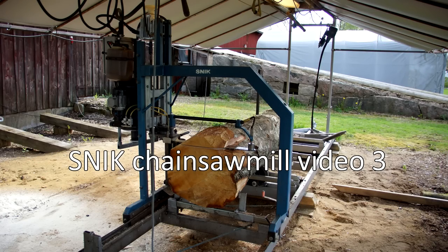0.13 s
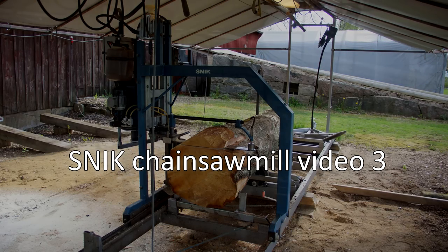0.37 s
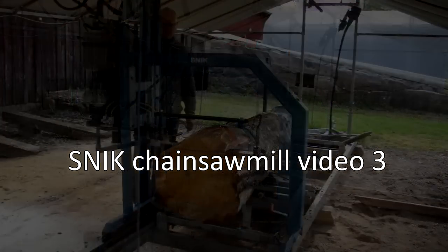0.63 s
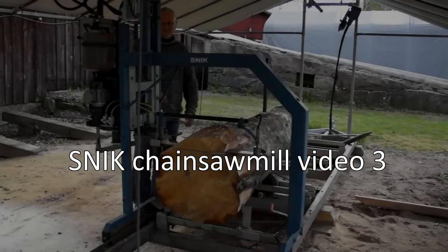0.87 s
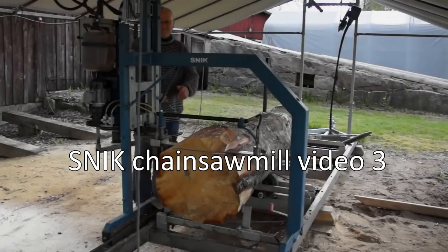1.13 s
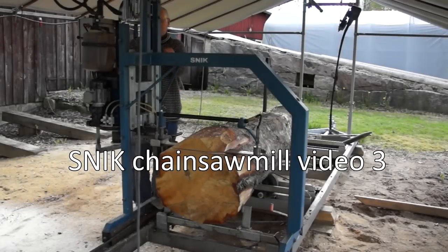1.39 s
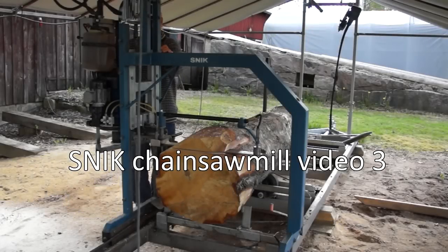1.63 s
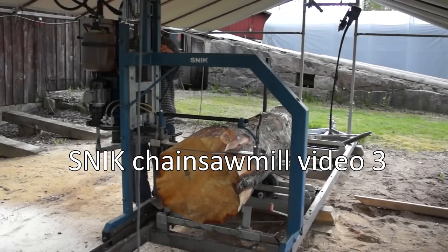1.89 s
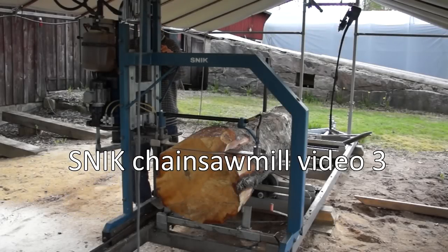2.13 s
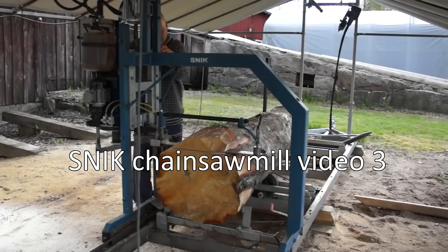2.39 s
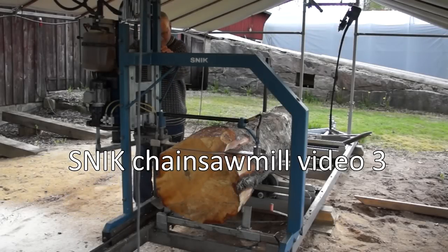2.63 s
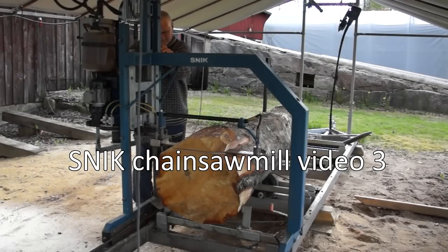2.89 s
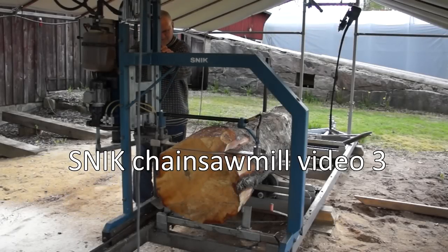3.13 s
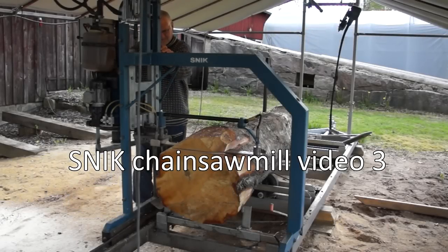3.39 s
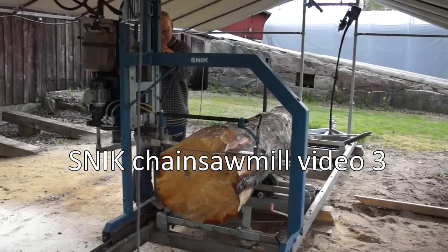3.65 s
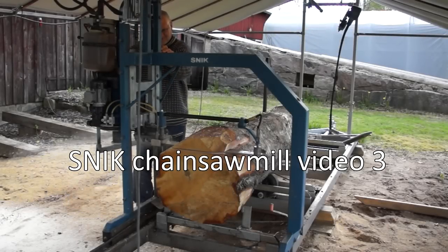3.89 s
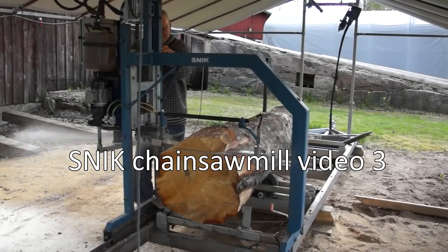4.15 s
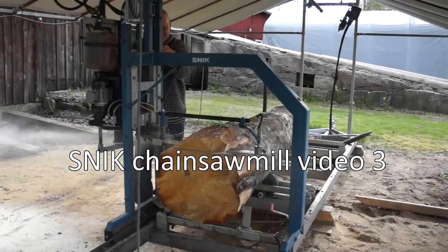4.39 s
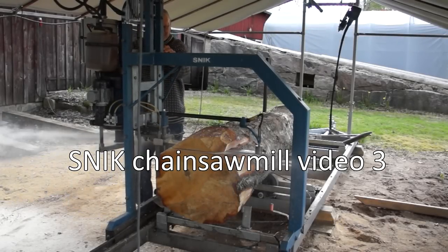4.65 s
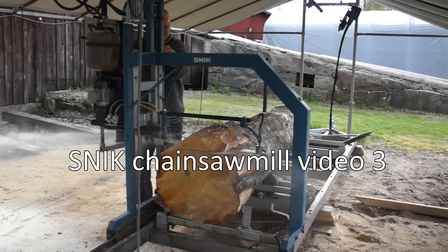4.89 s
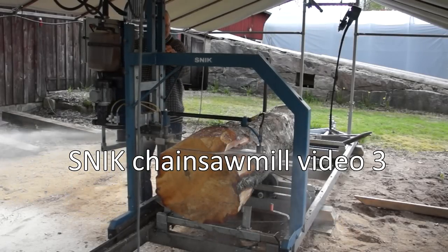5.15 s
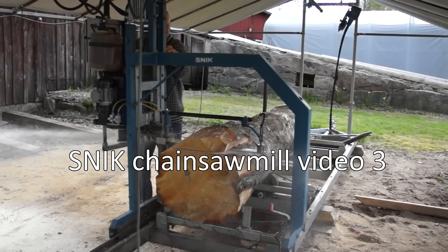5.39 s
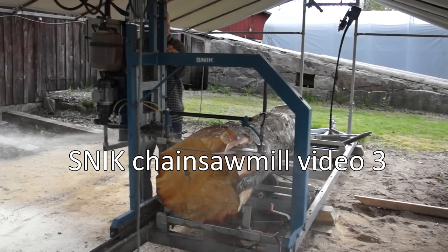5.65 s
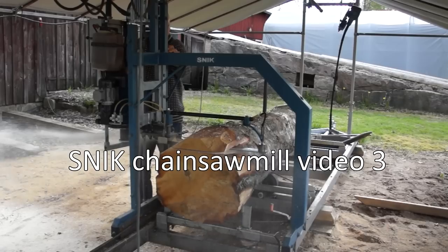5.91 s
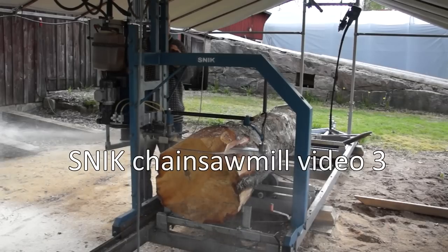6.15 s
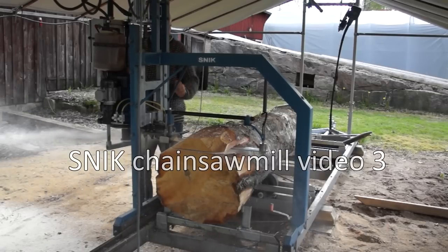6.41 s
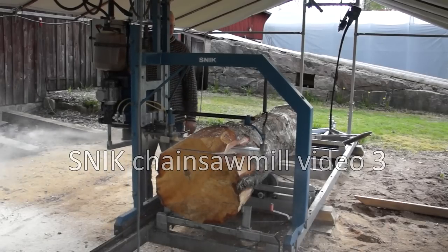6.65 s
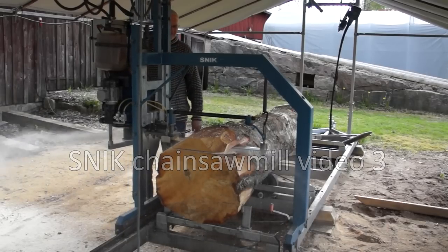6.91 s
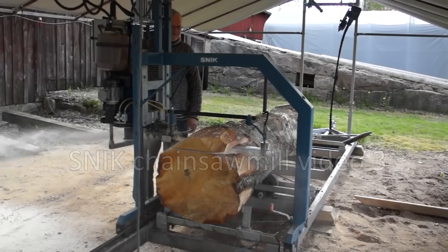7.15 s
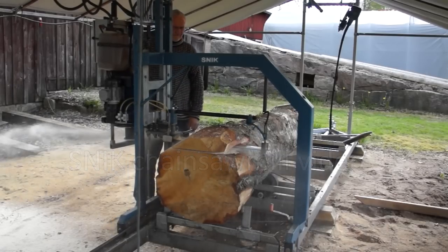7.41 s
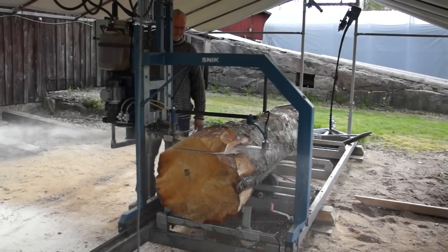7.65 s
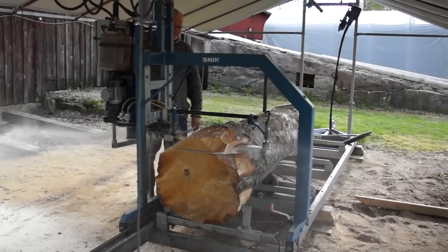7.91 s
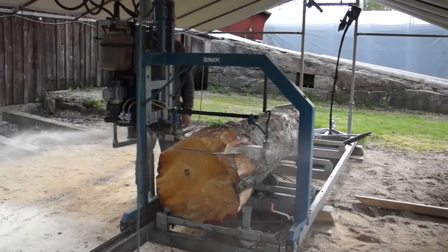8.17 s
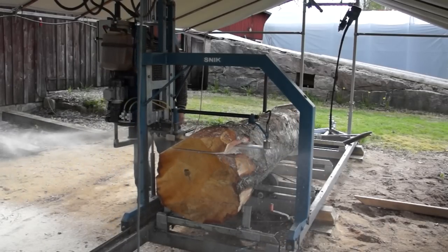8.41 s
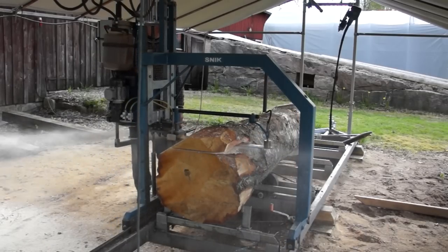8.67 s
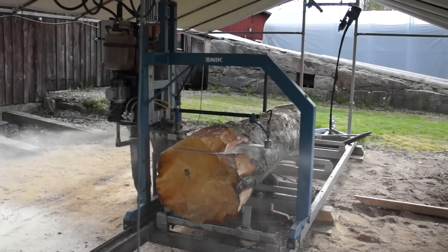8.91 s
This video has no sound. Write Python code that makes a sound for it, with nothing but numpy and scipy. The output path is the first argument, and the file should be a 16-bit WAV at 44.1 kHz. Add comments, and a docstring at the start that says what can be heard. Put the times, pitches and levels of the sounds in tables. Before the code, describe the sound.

Quiet yard air with three tiny ticks, then a chain sawmill fades in while rapidly spinning up to a high, steady belt whine with rushing chain hiss. After about three seconds of free running it bites into a log; pitch dips and wobbles, a coarse buzzing growl joins. Faint wooden knocks. Stereo microphones near the machine, open shed, little echo.

```python
"""A quiet yard with three small ticks, then a belt-driven chain sawmill under an open shed roof fades in.
It spins up, runs free and bites into a log, whose load drags the speed down.
Drive links striking an eight-tooth sprocket and a whining toothed belt are sums of shaft-locked partials;
rumble, chain roar, hiss, belt air and guard ringing are shaped noise; wooden knocks are decaying modes."""
import sys
import numpy as np
from scipy import signal
from scipy.fft import rfft, irfft
from scipy.io import wavfile
from scipy.ndimage import uniform_filter1d

SR = 44100
rng = np.random.default_rng(int(sys.argv[2]) if len(sys.argv) > 2 else 0)


def convert_level_to_amplitude(level_db):
    """Map a level in decibels to its linear amplitude factor."""
    exponent = np.asarray(level_db, float) / 20
    return 10 ** exponent


def store_wav(level_fs):
    """Save 16-bit WAV to argv[1]."""
    pcm = np.round(np.clip(np.atleast_2d(level_fs), -1, 1) * 32767)
    wavfile.write(sys.argv[1], SR, pcm.T.astype(np.int16))


N = 398663

T = np.arange(N) / SR
STEP = np.arange(1024) / 100  # control times, s
FRAME_T = np.arange(N // 256 + 5) * 256 / SR  # noise frame times, s
HZ = np.fft.rfftfreq(1024, 1 / SR)
FULL_S, CLIMB_END_S = .825, .8  # full speed reached; end of the spin-up emphasis of the noise
BELT_TEETH, LOOPS_PER_TURN = 171, .25259  # belt loops for each shaft turn
# cut depth, 0 free, 1 biting, 2 deep, 3 settled: (time [s], depth [stage])
DEPTH = [(0, 0), (3.62, 0), (3.72, 1), (4.9, 1), (5.7, 2), (7, 2), (7.6, 3), (9.1, 3)]
# belt whine: (time [s], relative level [dB], centre under load [lines from the tooth rate])
WHINE = [(.5, -55, 0), (.7, -37, -1), (.84, -29, -1.3), (1.7, -22, -1.5), (3.6, -21.5, -.7),
         (3.75, -24, -1.2), (4.2, -22, .1), (4.62, -26, .3), (4.92, -22.5, 1), (5.2, -27, 1.2),
         (5.58, -28, 1), (5.68, -34, 1.5), (5.92, -36, 0), (5.97, -24, -.8), (6.15, -27.5, -2),
         (6.5, -24, -.5), (6.62, -30, -1), (6.76, -30, -1.1), (6.85, -24, -1), (7.35, -22, -.7),
         (7.5, -21.5, .8), (7.7, -20, -.3), (8.25, -20, -.8), (8.4, -22, -.4), (8.55, -18.5, -.3),
         (8.75, -21, .1), (9.04, -20, -.2)]
# frame rumble, chain roar, hiss, relative levels:
# (free [dB], biting [dB], deep [dB], settled [dB], share of the fade-in [ratio])
LAYERS = [(-40.5, -38.5, -37, -36.5, 0.44), (-24, -22.5, -22, -24, 0.91), (-24.5, -25.5, -25, -27.5, 1.19)]


def curve(rows, t=T):
    """Piecewise-linear interpolation of every column against the first."""
    s, *columns = np.transpose(rows)
    return np.array([np.interp(t, s, c) for c in columns])


def read(points, hz):
    """Spectral envelope interpolated on a logarithmic frequency axis."""
    return curve([(np.log(p[0]), *p[1:]) for p in points], np.log(hz + 1))


def by_depth(values, t):
    """Load dependence: one value for each stage of the cut, interpolated between stages."""
    return np.interp(curve(DEPTH, t)[0], range(len(values)), values)


def loading(t):
    """Load of the wood on the drive, 0 running free to 1 cutting."""
    return np.minimum(curve(DEPTH, t)[0], 1)


def swell(t):
    """Exponential approach: the mill's fade-in, in dB."""
    from_s, rise_s = 0.24, 0.85
    return 20 * np.log10(1 - np.exp(-np.maximum(t - from_s, .004) / rise_s))


def speed(t):
    """Shaft speed over time, in turns per second: a ramp up, a steady run, then slower, unsteady turning."""
    start_s, start_speed, free_speed, bite_s = .27, 33, 137.49, 3.64
    # sprocket shaft dragged by the wood: (time [s], speed [turns/s])
    dragged = [(3.69, 134.6), (3.82, 136.3), (3.89, 135.4), (3.96, 136.1), (4.12, 133.4), (4.26, 130.7),
               (4.42, 131.8), (4.52, 130.3), (4.68, 129.4), (4.9, 131.3), (5.06, 129.2), (5.16, 129.1),
               (5.29, 124.5), (5.41, 125.8), (5.53, 123.8), (5.66, 129.8), (5.76, 130.4), (5.88, 128.8),
               (5.94, 129), (6.06, 126.85), (6.2, 128.6), (6.28, 127.9), (6.44, 129.9), (6.56, 129.25),
               (6.67, 130.5), (6.88, 130), (7, 127.8), (7.16, 129.3), (7.27, 129.1), (7.36, 130.1),
               (7.5, 126), (7.62, 128), (7.76, 127.7), (7.82, 128.9), (8.08, 129.7), (8.18, 128.6),
               (8.26, 129.35), (8.42, 128.95), (8.5, 129.75), (8.7, 127.75), (9.04, 128.15)]
    ramp = [(start_s, start_speed), (FULL_S, free_speed), (bite_s, free_speed)]
    return curve(ramp + dragged, t)[0]


def slow(rate, count):
    """Low-passed random drifts of rms 1, one row each, at 100 points a second; rate in Hz."""
    hz, z = np.fft.rfftfreq(1024, .01), rfft(rng.standard_normal((count, 1024)))
    drift = irfft(z / (1 + (hz / rate) ** 2))
    return drift / drift.std(1, keepdims=True)


def tone(turns, multiple, db, waver_db, rate, wander, start):
    """Order locking: one partial follows the shaft angle while its level and phase [rad] drift."""
    level_drift, phase_drift = slow(rate, count=2)
    phase = 2 * np.pi * multiple * turns + np.interp(T, STEP, start + wander * phase_drift)
    return np.interp(T, STEP, np.sqrt(2) * convert_level_to_amplitude(db + waver_db * level_drift)) * np.cos(phase)


def noise(shape_db, level_db, patchy_db, flicker_db):
    """Partly coherent noise: random short-time spectra for two microphones, level set frame by frame."""
    # shared part of the two microphones: (frequency [Hz], coherence [ratio])
    coherence = [(60, 0.093), (120, 0.51), (240, 0.79), (480, 0.14), (950, 0.62), (1900, 0.86),
                 (2600, 0.81), (3300, 0.66), (4000, 0.99), (5000, 0.79), (6000, 0.68), (7200, 1),
                 (9000, 0.74), (15000, 0.54)]
    # balance: (frequency [Hz], left minus right [dB])
    tilt = [(60, -2.5), (150, -2.5), (380, 0.5), (950, 1), (2380, 0.0), (5980, 0), (15000, 0.5)]
    frames = shape_db.shape[1]
    a, b, c, d, patches = rng.standard_normal((frames, 513, 5)).T
    patches = uniform_filter1d(uniform_filter1d(patches, size=10, axis=0), size=12, axis=1)
    flicker = uniform_filter1d(rng.standard_normal(frames), size=8)
    waver_db = patchy_db * patches / patches.std() + flicker_db * flicker / flicker.std()
    shape = convert_level_to_amplitude(shape_db)
    shape = shape / np.sqrt((shape ** 2).sum(0)) * convert_level_to_amplitude(level_db + waver_db)
    same = np.clip(read(coherence, HZ)[0], -1, 1)[:, None]
    left = a + 1j * b
    right = same * left + np.sqrt(1 - same ** 2) * (c + 1j * d)
    lean = read(tilt, HZ)[0][:, None] / 2
    z = np.array([left, right]) * shape * convert_level_to_amplitude(np.array([lean, -lean]))
    return signal.istft(z, nperseg=1024, noverlap=768)[1][:, :N]


def hump(x, width):
    """Resonance-like band, in dB: flat near zero, falling steeply beyond the width."""
    return -10 * np.log10(1 + (x / width) ** 4)


def layer_db(row):
    """Level of one noise layer: load dependence, fade-in and a steep rise at the very start."""
    *db, share = row
    return by_depth(db, FRAME_T) + share * swell(FRAME_T) - 220 * np.maximum(.27 - FRAME_T, 0)


def blend(points):
    """Spectral envelope crossing from free running to cutting as the load grows."""
    free_db, cut_db = read(points, HZ)
    load = loading(FRAME_T)
    return np.outer(free_db, 1 - load) + np.outer(cut_db, load)


def sprocket(turns):
    """Periodic impact: eight link strikes a turn give harmonics, unevenness gives lines at other shaft orders."""
    # link strikes at the strike rate: (time [s], level [dB])
    strike = [(.3, -67), (.5, -66), (.85, -39), (1.5, -37.5), (3.55, -44.5), (3.75, -33), (4.05, -34),
              (4.3, -27.5), (5.05, -30), (5.3, -32.5), (6.05, -29.5), (7.55, -26), (8.5, -30.5), (8.8, -27)]
    # overtones before fade-in: (multiple [of strike rate], spinning up [dB], free [dB], biting [dB],
    # deep [dB], settled [dB])
    overtones = [(2, -33, -34, -32, -35, -36), (3, -45, -33, -40, -35, -34), (4, -46, -31, -46, -40, -36),
                 (5, -44, -30, -37, -31, -32)]
    # uneven sprocket and chain, before fade-in: (multiple [of shaft rate], free [dB], biting [dB], deep [dB])
    orders = [(1, -52.6, -53.8, -56.2), (2, -61.4, -48.0, -47.6), (3, -51.1, -50.6, -64.0),
              (4, -54.5, -44.7, -48.5), (5, -51.8, -51.7, -52.8), (6, -46.3, -44.4, -49.0),
              (7, -48.6, -46.0, -48.6), (9, -50.8, -39.4, -43.2), (10, -43.4, -45.7, -48.6),
              (11, -45.4, -46.2, -47.0), (12, -39.2, -49.3, -42.8), (13, -44.7, -45.7, -49.8),
              (14, -39.3, -52.0, -43.0), (15, -57.2, -39.9, -37.5), (17, -49.1, -45.0, -45.6),
              (18, -42.6, -43.8, -42.8), (19, -52.2, -50.8, -40.5), (20, -35.5, -39.6, -43.5),
              (21, -49.9, -45.6, -47.0), (23, -57.7, -42.6, -38.8), (25, -59.3, -41.5, -40.4),
              (26, -58.3, -46.1, -46.1), (27, -57.7, -47.7, -46.6), (28, -45.5, -42.6, -44.7),
              (33, -39.2, -49.5, -57.3), (34, -45.0, -40.7, -47.8), (35, -41.9, -43.4, -49.7),
              (36, -38.1, -44.9, -40.1), (37, -44.7, -48.5, -54.2), (38, -54.0, -44.0, -53.4),
              (39, -54.2, -39.8, -40.6), (41, -43.4, -50.7, -43.7), (42, -37.4, -47.3, -41.7),
              (48, -47.9, -49.2, -51.5), (56, -46.9, -46.8, -48.2), (64, -46.7, -42.8, -48.3),
              (80, -59.2, -46.0, -46.0)]
    # fade-in of those orders: (time [s], gain [dB])
    fade = [(0, -62), (.27, -13), (.4, -3.5), (.6, -7.5), (1, -5), (1.5, -2), (2.2, 1), (9.1, 1)]
    load = loading(STEP)
    fade_db = curve(fade, STEP)[0] - 9 * (STEP < .62)  # weaker still at low speed
    shake = 0.0052 + 0.0076 * load  # the wood shakes the timing: radians for each multiple of the shaft rate
    drift_db = 2.5 * slow(1.8, count=4) * load + swell(STEP)
    # the highest overtone dips briefly
    dip_s, dip_width_s, dip_db = 5.62, 0.17, -7
    drift_db[-1] += dip_db * np.exp(-((STEP - dip_s) / dip_width_s) ** 4)
    lines = [(8, curve(strike, STEP)[0])]
    for (k, up_db, *db), drift in zip(overtones, drift_db):
        lines.append((8 * k, np.where(STEP < FULL_S, up_db, by_depth(db, STEP)) + drift))
    for (k, *db), drift in zip(orders, slow(.8, count=len(orders))):
        lines.append((k, by_depth(db, STEP) + fade_db + 1.5 * drift))
    return sum(tone(turns, k, db, 1.1 + 0.016 * k, 17.4, shake * k, 2 * np.pi * rng.random())
               for k, db in lines)


def belt(turns):
    """Sideband comb: tooth errors repeat each belt loop; tension under load narrows the comb."""
    # relative line levels running free, one column: (level [dB]), one row per loop rate, low to high
    comb = [-46.9, -45.9, -43.3, -41.1, -42.2, -39.8, -36.0, -34.9, -29.6, -32.7, -30.5, -31.7, -36.1,
            -27.8, -32.8, -33.5, -35.7, -39.3, -41.2, -43.7, -46.1, -47.4, -44.2, -46.1, -50.7, -48.6,
            -59.4]
    lines_below = 12
    sway_once, sway_twice, taut_lines = 1.1, 2.1, 4  # radians once and twice a loop; lines under load
    load = loading(STEP)
    away = np.arange(len(comb))[:, None] - lines_below
    whine_db, centre = curve(WHINE, STEP)
    off = abs(away - centre) / 1.8
    taut_db = -10 * np.log10(1 + off ** 6) - 3 * np.minimum(off, 1)
    levels = np.outer(comb, 1 - load) + (taut_db - 30) * load
    # hold the summed power of the lines to the whine level
    levels += whine_db - 10 * np.log10((convert_level_to_amplitude(levels) ** 2).sum(0)) + 1.1
    # spacing errors sway the pitch within each loop, which spreads the phases of the lines
    loop = np.arange(64) * 2 * np.pi / 64
    swayed = np.exp(1j * (sway_once * np.sin(loop + 1) + sway_twice * np.sin(2 * loop)))
    sway = np.angle(np.fft.fft(swayed))[away]
    sweep = sway * (1 - load) + np.pi * away ** 2 / taut_lines * load
    return sum(tone(turns, (BELT_TEETH + n) * LOOPS_PER_TURN, db, 1.5, 2.5, .22, start)
               for n, db, start in zip(away[:, 0], levels, sweep))


def chain_roar(turns):
    """Amplitude modulation: cutters pass four times a turn and beat the roar and hiss, the shaft once."""
    # spectra: (frequency [Hz], free [dB], cutting [dB])
    roar_shape = [(385, -14, -15), (820, -4, -7.5), (1030, -4, -3.5), (2000, -2, -2), (3000, -1.5, -1.5),
                  (3070, -2.5, -1.5), (3930, -6, -5.5), (4420, -2.5, -4), (4500, -5, 2.5), (4660, 4, 0),
                  (5460, 1, 4.5), (6060, -1.5, 2.5), (6960, -7, -6.5), (8900, -42, -31)]
    hiss_shape = [(4020, -25, -22), (6500, 2.5, -7.5), (7400, -3, -2.5), (9400, 0.5, 0.5), (11000, 2, 1),
                  (13600, -1.5, -4.5), (17000, -2, -3.5), (19800, -43, -16.5)]
    roar = noise(blend(roar_shape), layer_db(LAYERS[1]) + 3.5, 1.0, 0.33)
    hiss = noise(blend(hiss_shape), layer_db(LAYERS[2]) + 2.5, 0.58, 0.64)
    beat = 1 + 0.35 * np.cos(8 * np.pi * turns) + 0.053 * np.cos(2 * np.pi * turns)
    return (roar + hiss) * beat


def belt_air():
    """Air pumping: air squeezed from the belt makes noise bands at the tooth rate and its octave."""
    # octave band relative to the hiss, one column: (level [dB]), rows free, biting, deep, settled
    whistle = [-18, -10, -8.5, -7.5]
    shift = 0.77  # multiples of the shaft rate the octave sits higher under load
    load, hiss_db = loading(FRAME_T), layer_db(LAYERS[2])
    order = HZ[:, None] / speed(FRAME_T)
    teeth = BELT_TEETH * LOOPS_PER_TURN
    puff_db = 0.46 * curve(WHINE, FRAME_T)[0] + 0.46 * hiss_db - 10.5
    puff_db = puff_db - 8 * (FRAME_T < .56)  # faint at low speed
    puff = noise(hump(order - teeth, 1.6 - .5 * load), puff_db, 0.7, .5)
    whistle_db = hiss_db + by_depth(whistle, FRAME_T) + 12 * (FRAME_T < CLIMB_END_S)
    return puff + noise(hump(order - 2 * teeth - shift * load, 0.48), whistle_db, 1.2, 0.94)


def blurred_orders():
    """Order smearing: high shaft orders appear as narrow noise bands that follow the speed."""
    # relative bands: (multiple [of shaft rate], free [dB], cutting [dB])
    bands = [(56, -3, -6), (64, -4, 0), (72, 0, -6), (78, -2, -9), (80, -6, 0), (84, -2, -9), (88, -1, -3),
             (96, -1, -9)]
    load = loading(FRAME_T)
    order = HZ[:, None] / speed(FRAME_T)
    blur = sum(convert_level_to_amplitude(hump(order - k, 0.25) + free_db + (cut_db - free_db) * load) ** 2
               for k, free_db, cut_db in bands)
    return noise(10 * np.log10(blur), layer_db(LAYERS[2]) - 10.5, 2.7, 1.0)


def guard_ring():
    """Structural resonance: the belt guard rings in fixed bands, stronger during spin-up."""
    # ringing: (frequency [Hz], width [Hz], level over the hiss after spin-up [dB])
    modes = [(4770, 55, -11), (3310, 91, -13)]
    out = np.zeros((2, N))
    for ring_hz, width, db in modes:
        shape = hump(HZ[:, None] - ring_hz + 0 * FRAME_T, width)
        out += noise(shape, layer_db(LAYERS[2]) + db + 9 * (FRAME_T < CLIMB_END_S), 1.2, 2.2)
    return out


def frame_rumble():
    """Broadband structural vibration: low noise of the frame under a fixed spectral envelope."""
    # spectrum: (frequency [Hz], level [dB])
    rumble_shape = [(30, -49), (60, -48), (100, -7.5), (140, 4.5), (250, -4.5), (500, -3.5), (800, -1),
                    (1500, -11.5), (3000, -54)]
    return noise(read(rumble_shape, HZ).T + 0 * FRAME_T, layer_db(LAYERS[0]) + 3.5, 1.0, 0.36)


def shed(x, t60, wet_db):
    """Sparse reflections: sideways echoes reach the two microphones with opposite polarity."""
    taps = np.zeros(SR // 4)
    at = np.arange(100, SR // 4 - 20, 20) + rng.integers(0, 20, (SR // 4 - 101) // 20)
    taps[at] = rng.choice([-1., 1.], len(at)) * convert_level_to_amplitude(-60 * T[at] / t60)
    echo = convert_level_to_amplitude(wet_db) * signal.oaconvolve(x, taps / np.linalg.norm(taps))[:N]
    return np.array([x + echo, x - echo])


def knocks():
    """Modal decay: faint wooden knocks off to one side ring in a few damped modes."""
    # knocks: (time [s], level [dB])
    hits = [(1.395, -36), (1.97, -28), (2.021, -26), (2.25, -32), (4.52, -30), (6.54, -26), (6.9, -27),
            (6.97, -26), (7.04, -32), (7.099, -28)]
    # wood modes: (nominal frequency [Hz], relative level [dB], t60 [s])
    modes = [(650, 0, 0.12), (1020, 1, 0.054), (1400, 4, 0.049), (1790, 3, .035)]
    out, ring = np.zeros((2, N)), T[:2000]
    for s, db in hits:
        knock = np.zeros(len(ring))
        for f, mode_db, t60 in modes:
            decay = convert_level_to_amplitude(db + mode_db - 60 * ring / t60)
            knock += decay * np.sin(2 * np.pi * f * rng.uniform(0.89, 1.07) * ring)
        out[:, round(s * SR):round(s * SR) + len(ring)] += np.outer([1, -.3], knock)
    return out


def yard():
    """Ambient noise that decays 12 dB a second, and three ticks as damped, noisy oscillations."""
    # air spectrum: (frequency [Hz], relative level [dB])
    air_shape = [(24, -55), (40, -25), (117, -4), (287, -1), (368, -12), (427, -6), (1020, -5), (1310, -1),
                 (4800, -19), (15500, -34)]
    # ticks: (time [s], starting level of the sine [dB], frequency [Hz])
    ticks = [(0.0533, -49, 3500), (0.1291, -40, 4760), (0.1404, -41, 3070)]
    out = noise(read(air_shape, HZ).T + 0 * FRAME_T, -41 - 12 * FRAME_T, 1.6, 0.58)
    ring = T[:600]
    for s, db, f in ticks:
        grain = np.sin(2 * np.pi * f * ring) + .5 * rng.standard_normal(len(ring))
        out[:, round(s * SR):round(s * SR) + len(ring)] += convert_level_to_amplitude(db - 60 * ring / 0.018) * grain
    return out


def scene():
    """Superposition of all sources, driven by the integrated shaft speed."""
    turns = np.cumsum(speed(T)) / SR
    whine = belt(turns)
    # the whine reaches the microphones a little out of step, more so once the chain is in the wood
    skew = convert_level_to_amplitude(-25.0 + 1.5 * loading(T)) * np.roll(whine, 2)
    mill = shed(sprocket(turns), t60=0.025, wet_db=-10.0) + whine + np.array([skew, -skew])
    mill = mill + chain_roar(turns) + belt_air() + blurred_orders() + guard_ring() + frame_rumble()
    return mill + knocks() + yard()


def low_pass(x):
    """Removes everything above the highest recorded frequency."""
    return signal.sosfilt(signal.butter(12, 16930, fs=SR, output="sos"), x)


def record(dry):
    """Band limiting: a gentle bass cut from the microphones, then a steep low-pass on the top of the treble."""
    thin = signal.sosfilt(signal.butter(1, 140, "high", fs=SR, output="sos"), dry)
    edge = signal.firwin(1023, 15780, window=("kaiser", 9), fs=SR)  # low-pass edge in Hz
    mix = signal.oaconvolve(thin, edge[None], "same", axes=1)
    return low_pass(mix)


dry = scene()
out = record(dry)
store_wav(out)
```